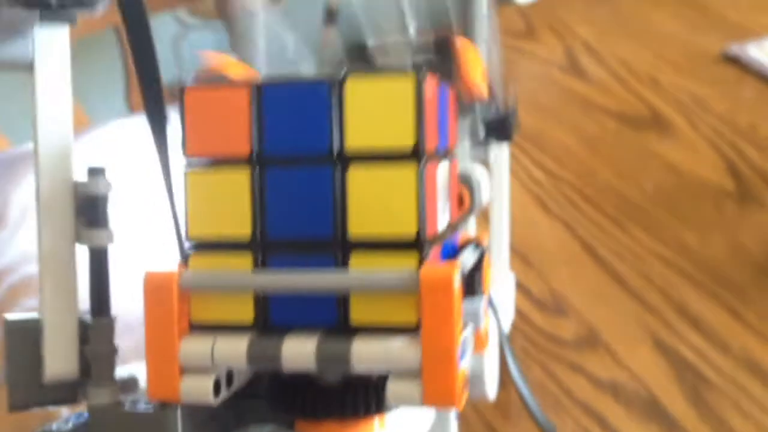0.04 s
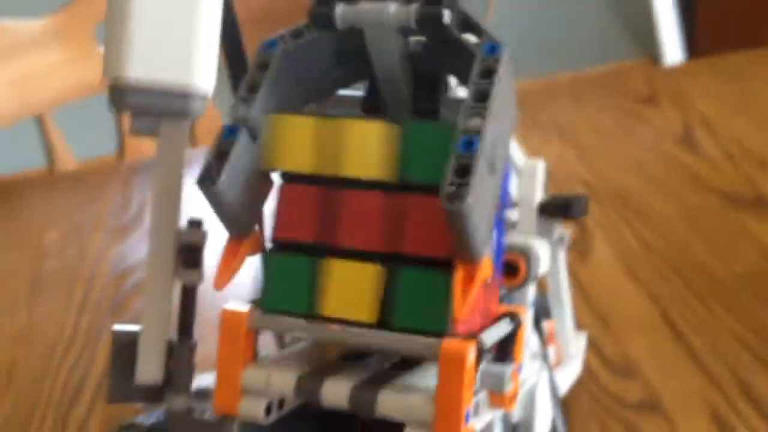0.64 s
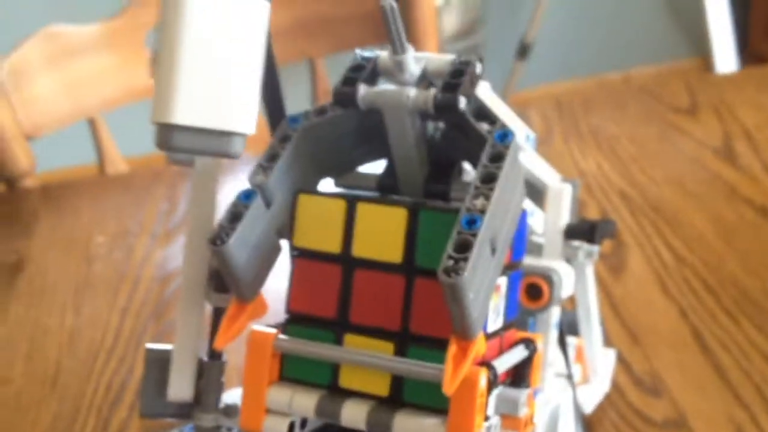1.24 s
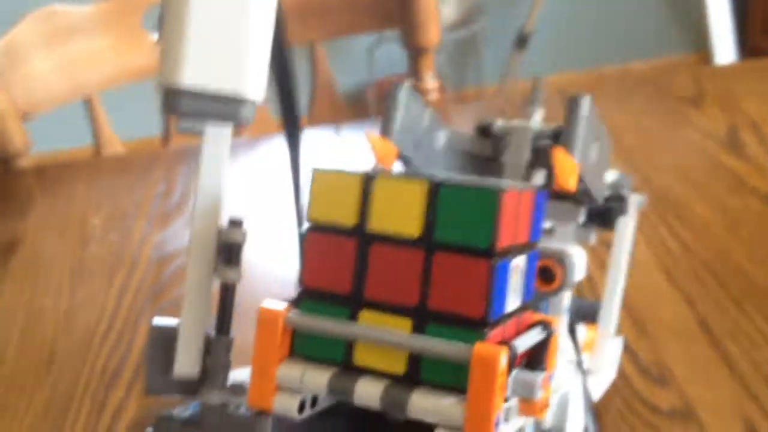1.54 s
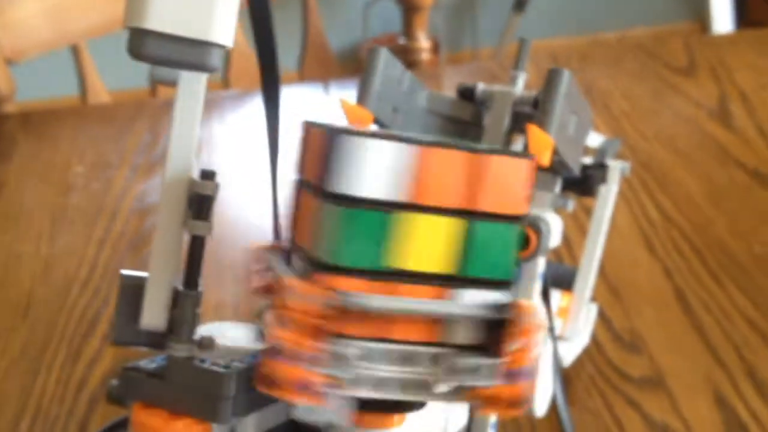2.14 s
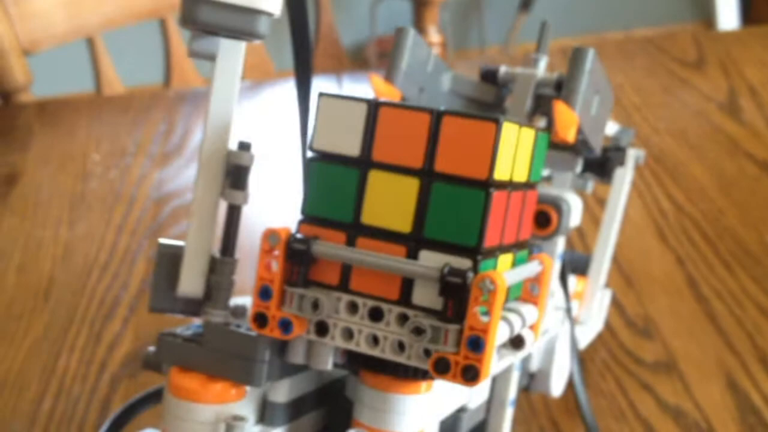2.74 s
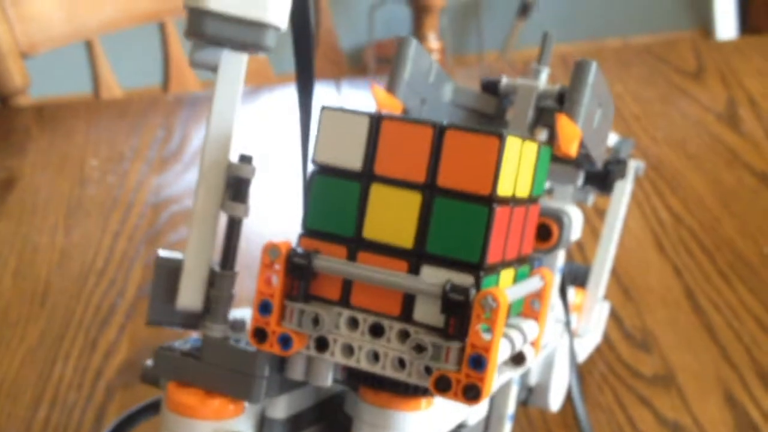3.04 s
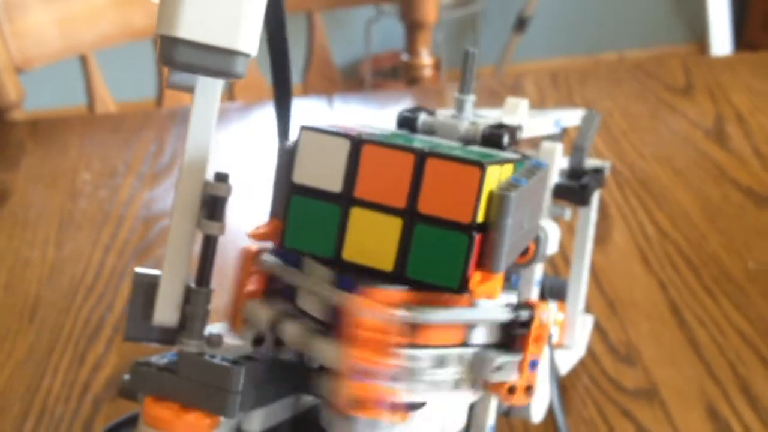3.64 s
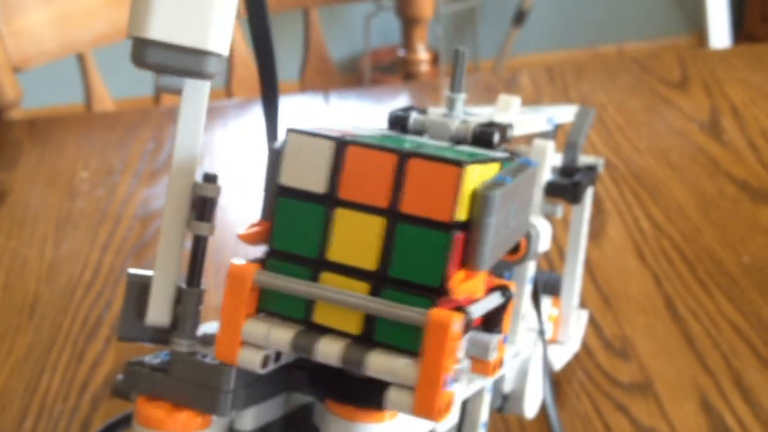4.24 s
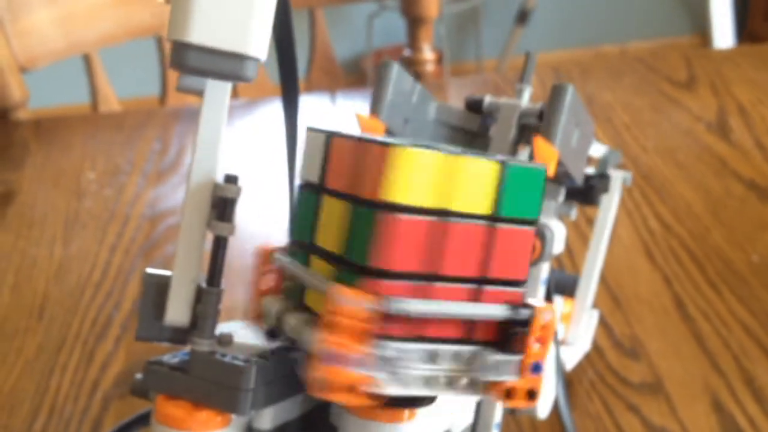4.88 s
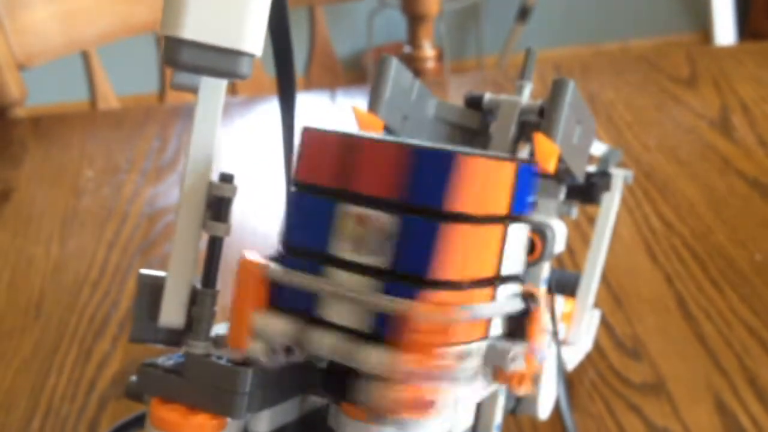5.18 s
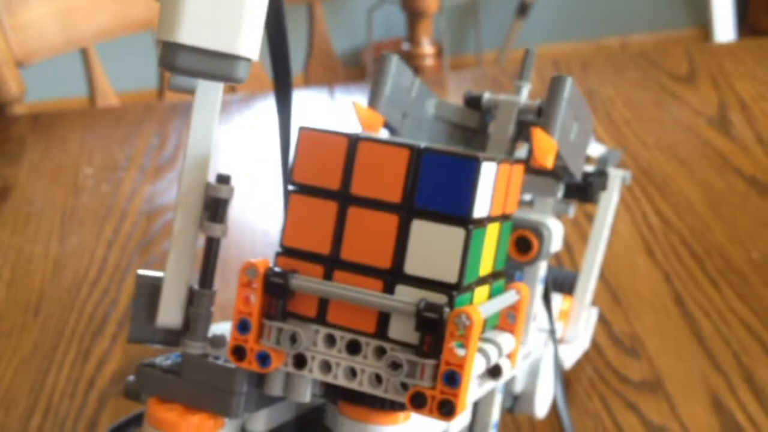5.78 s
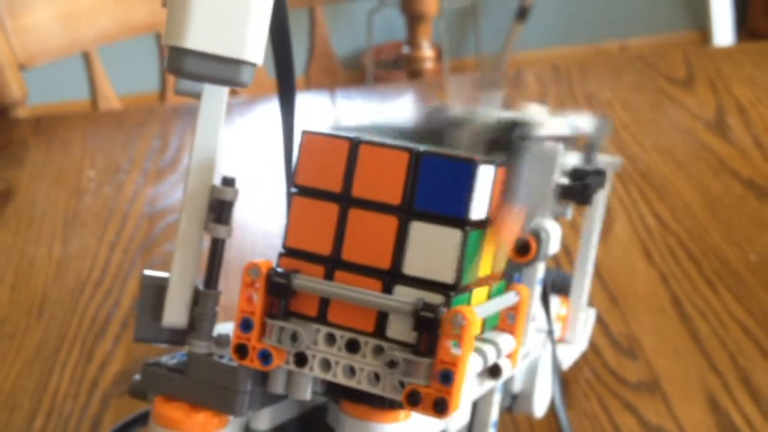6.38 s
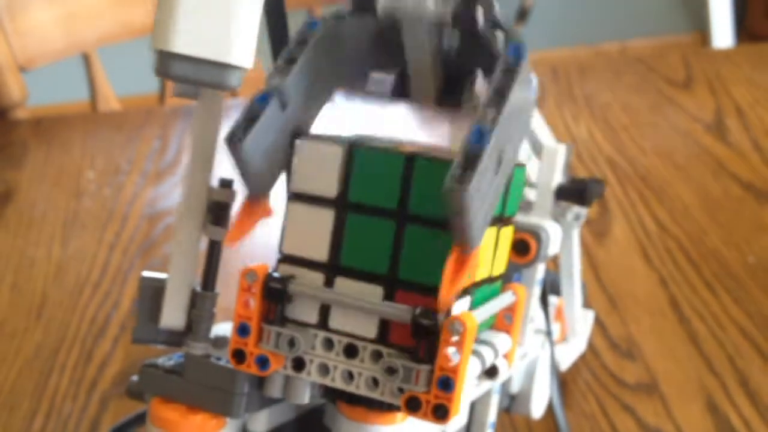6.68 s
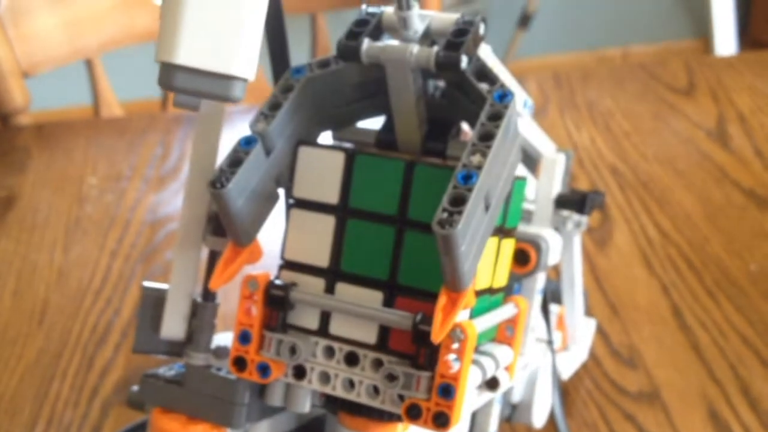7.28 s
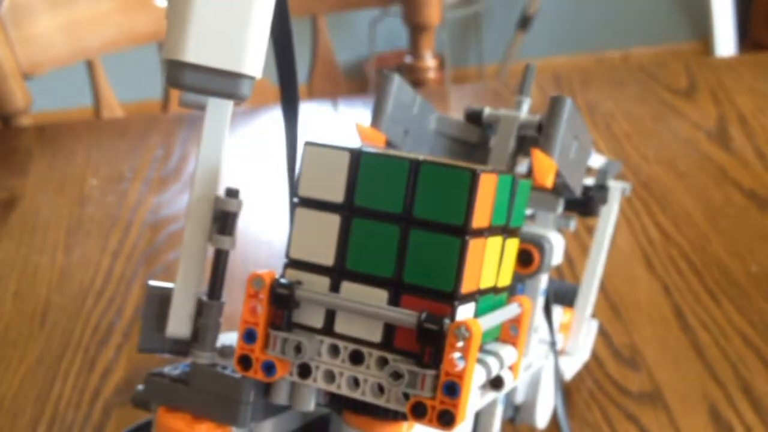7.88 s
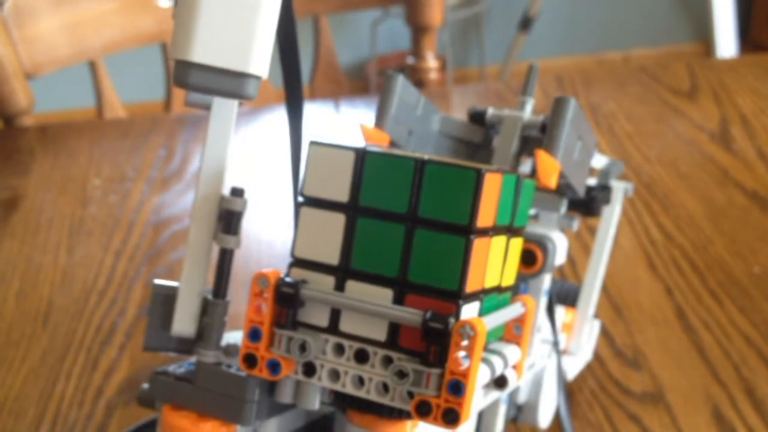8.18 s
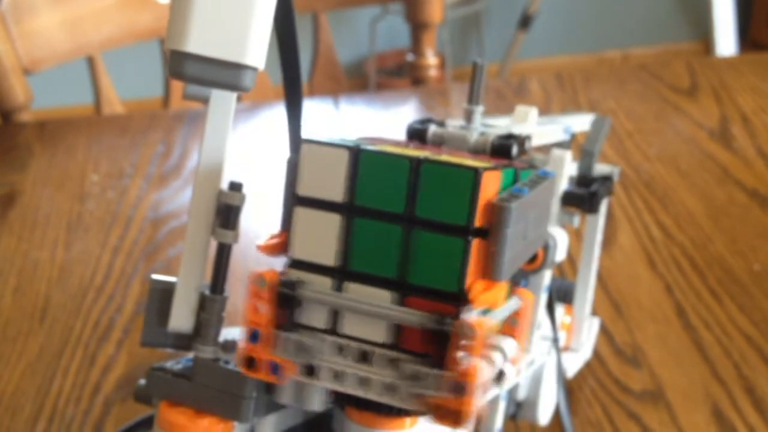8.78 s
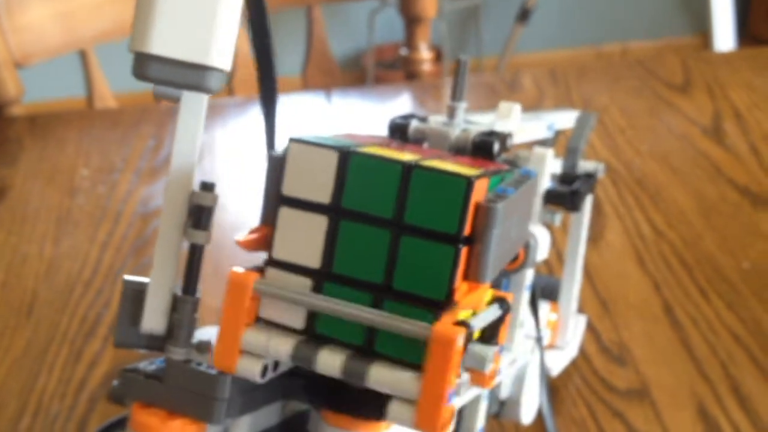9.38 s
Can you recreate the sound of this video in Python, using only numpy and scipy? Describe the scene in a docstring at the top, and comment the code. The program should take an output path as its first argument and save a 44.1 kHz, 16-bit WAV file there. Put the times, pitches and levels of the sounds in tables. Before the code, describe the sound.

Sharp plastic clacks alternate with short raspy whirs and rising whines as a small robot's geared motors flip and twist a puzzle cube.

```python
"""A small plastic robot solves a puzzle cube on a wooden table, over the hum of a quiet room.
First a geared motor swings the squeaky arm, which clacks onto the cube and tips it over. Near 2 s
a second motor spins the cube in its cradle with a pulsing rasp, then sings faintly as it holds still.
The arm clacks again, and near 4 s the cradle twists one layer with a rising whine. More clacks,
a second spin near 5 s and three more arm strokes lead to a last twist at 9 s."""
import sys
import numpy as np
from scipy import signal
from scipy.fft import rfft, irfft
from scipy.io import wavfile
from scipy.ndimage import uniform_filter1d

SR = 44100
rng = np.random.default_rng(int(sys.argv[2]) if len(sys.argv) > 2 else 0)


def wav_record(signal):
    """Record a signal, one row per channel, as 16-bit PCM in the file named by sys.argv[1]."""
    frames = np.transpose(np.atleast_2d(signal))
    bounded = np.clip(frames, -1, 1)
    # unit amplitude maps onto the largest positive 16-bit level
    quanta = np.round(bounded * 32767).astype(np.int16)
    wavfile.write(sys.argv[1], SR, quanta)


N = 419832
T = np.arange(N) / SR

# strokes of the arm: (start [s], stop [s], gear level [dB])
ARM_STROKES = [(0.036, 0.183, -45), (0.214, 0.39, -53.5), (0.494, 0.748, -42.5), (1.303, 1.308, -55.5),
               (1.503, 1.65, -43), (3.229, 3.332, -46.5), (4.653, 4.78, -45.5), (6.452, 6.775, -44),
               (7.468, 7.59, -42.5), (8.516, 8.567, -43.5)]
# whine of free-running gears: (multiple of the tooth rate, level [dB])
FREE_HARMONICS = [(1, -16), (2, -3), (3, -1), (4, -1), (5, -2), (6, 2), (7, -7.5), (8, -5.5)]
# plastic clacks of arm, cube and cradle:
# (time [s], level [dB], bright edge against that level [dB], attack [s], rattle decay [s])
CLACK_HITS = [(0.059, -17.5, -5, .001, .005), (0.0704, -17.5, 4.5, .0005, 0.0087),
              (0.1255, -12.5, 3.5, .002, 0.0066), (0.158, -10.5, 4, .003, 0.0054),
              (0.5568, -10, 0, .0001, 0.0024), (0.562, -8.5, 4.5, .0002, 0.004),
              (0.576, -17, -2.5, .002, .004), (0.662, -12, -9, .005, 0.0097),
              (0.7747, -12, -8.5, .0001, 0.0058), (0.930, -26, -16, .001, 0.0082),
              (1.288, -40, -22, .0005, 0.013), (1.533, -18, 0, .002, 0.01), (1.595, -19, 6.5, .001, 0.0071),
              (1.624, -14.5, 0, .001, 0.0065), (2.610, -35, -26, .0003, 0.0026),
              (3.243, -24.5, -6, .0005, 0.0056), (3.258, -21, 3, .002, .005),
              (3.308, -14, 1, .0001, 0.0056), (3.625, -24.5, -17, .0005, .004),
              (3.666, -15, -3.5, .0002, 0.0037), (4.397, -32, -21, .001, 0.0041),
              (4.694, -21.5, 9.5, .0005, 0.0036), (4.720, -22.5, 5, .002, 0.0066),
              (5.717, -40, -17, .0003, 0.0026), (5.762, -42.5, -14, .002, 0.0065),
              (6.417, -38, -20, .001, .01), (6.461, -19.5, -17, .0005, .003),
              (6.5208, -11, 2, .0001, 0.0039), (6.527, -10, 0.5, .0005, 0.0053),
              (6.637, -11.5, -5.5, .002, 0.0068), (6.7422, -15.5, 1, .001, .007),
              (6.8452, -18.5, 3, .0001, 0.0044), (7.495, -16.5, 4, .002, 0.005),
              (7.558, -14, 5, .004, 0.0083), (7.585, -12, 3, .002, 0.0072),
              (8.501, -28.5, -24, .0003, .004), (8.519, -21, -18, .001, .005),
              (8.553, -19, -15, .001, 0.0057), (8.590, -16, -7, .0003, 0.0053),
              (8.874, -41, -14, .0003, .005), (8.908, -24.5, -22, .0005, .004),
              (9.052, -21.5, -4, .0003, 0.0035)]
# tone colour of struck plastic: (frequency [Hz], level [dB])
PLASTIC_COLOUR = [(35, -50.5), (60, -28), (274, -15.5), (540, -16), (1250, -5.5), (1740, -10), (2140, -5.5),
                  (3940, -5), (4860, -5), (5330, -2.5), (6900, -2.5), (7750, -7.5), (13300, -13),
                  (14900, -13.5), (16000, -37.5)]
# resonances of the plastic frame: (frequency [Hz], width [Hz], lift [dB])
FRAME_RESONANCES = [(830, 240, 4), (1264, 120, 3.5), (2190, 115, 1.5), (3020, 220, 1), (4430, 250, 1.5),
                    (4860, 53, 3.5), (5890, 630, 1), (7000, 400, 0)]
# the cradle runs free to spin the cube or ease back into line: (start [s], stop [s], gear level [dB])
FREE_TURNS = [(1.78, 2.326, -41), (2.41, 2.467, -48), (4.331, 4.37, -47), (4.911, 5.43, -39),
              (5.54, 5.58, -46.5)]

START_HZ, TOP_HZ = 493.7, 728.6   # tooth rates of the cradle: setting off, and flat out running free
CRADLE_RISE_DB_PER_S, CRADLE_FALL_DB_PER_S = 454.5, 276


def from_db(db):
    """Decibels to gain."""
    return np.exp(np.asarray(db) * (np.log(10) / 20))


def rms_one(x):
    """Scale to unit rms."""
    return x / np.sqrt(np.mean(x ** 2) + 1e-20)


def at_hz(points, hz):
    """Read a table on a log-frequency axis."""
    f, value = np.transpose(points)
    return np.interp(np.log(np.maximum(hz, 1)), np.log(f), value)


def butter(x, hz, kind, order=2):
    """Butterworth filter."""
    sos = signal.butter(order, np.clip(hz, 10, .45 * SR), kind, fs=SR, output="sos")
    return signal.sosfilt(sos, x + 1e-18)


def drift(rate):
    """Smooth random wander of spread 1, with `rate` new values a second."""
    knots = rng.standard_normal(int(N / SR * rate) + 4)
    smooth = rms_one(signal.resample_poly(knots, 4, 1))
    return np.interp(T * rate * 4, np.arange(len(knots) * 4), smooth)


def add(track, s, sound):
    """Mix a short sound in at time s."""
    start = max(int(s * SR), 0)
    track[start:start + len(sound)] += sound[:N - start]


def coloured(x, spectrum, resonances=(), size=4096):
    """Minimum-phase EQ of unit power gain: a smooth curve with resonant humps."""
    hz = np.arange(size // 2 + 1) * SR / size
    humps_db = sum(lift / (1 + (2 * (hz - f) / width) ** 2) for f, width, lift in resonances)
    cepstrum = irfft(np.log(from_db(at_hz(spectrum, hz) + humps_db)))
    cepstrum[1:size // 2] *= 2
    cepstrum[size // 2 + 1:] = 0
    response = irfft(np.exp(rfft(cepstrum)))
    return signal.oaconvolve(x, response / np.linalg.norm(response))[:N]


def swell(t, peak_s):
    """Envelope that rises to 1 at peak_s and dies away."""
    return t / peak_s * np.exp(1 - t / peak_s)


def stroke(start, stop, rise_db_per_s, fall_db_per_s):
    """Envelope of one motor move: it swells up to its start, holds, and fades after its stop."""
    down_db = rise_db_per_s * np.maximum(start - T, 0) + fall_db_per_s * np.maximum(T - stop, 0)
    return from_db(-np.minimum(down_db, 200))


def speed_gain(tooth_hz, db_per_octave):
    """Faster gears are louder; the gain is 1 at TOP_HZ."""
    return from_db(db_per_octave * np.log2(tooth_hz / TOP_HZ))


def grit(per_s, spread_db):
    """Tiny random contacts of uneven size."""
    sizes = from_db(spread_db * np.minimum(rng.exponential(1, N), 4)) * rng.choice([-1, 1], N)
    return rms_one(sizes * (rng.random(N) < per_s / SR))


def gear_train(tooth_hz, harmonics, jitter, flutter_db, wobble):
    """Meshing teeth: a whine of uneven harmonics, and friction that peaks once per tooth."""
    phase = 2 * np.pi * np.cumsum(tooth_hz * (1 + jitter * drift(150))) / SR
    shaft = phase / 12   # twelve teeth a turn
    phase = phase + wobble * np.sin(shaft)   # an off-centre pinion gives sidebands
    whine = sum(from_db(db + flutter_db * drift(60)) * np.sin(round(k) * phase + rng.uniform(0, 2*np.pi))
                for k, db in harmonics)
    friction = grit(per_s=9000, spread_db=3) * (1 + .5 * np.cos(phase)) * (1 + .24 * np.sin(shaft))
    return rms_one(whine), rms_one(friction)


def room_tone():
    """A bed of low rushing air and mains hum."""
    # tone colour of the air: (frequency [Hz], level [dB])
    air_colour = [(18, -79.5), (30, -59), (90, -16.5), (103, -20.5), (157, -5), (364, -7.5), (437, -14.5),
                  (486, -11.5), (554, -15.5), (702, -14.5), (1430, -23.5), (3200, -30), (7870, -32.5),
                  (9220, -40), (14800, -35.5), (16000, -51.5)]
    air = butter(coloured(rng.standard_normal(N), air_colour), 95, "high")
    hum = np.sin(2 * np.pi * 120 * T)
    return from_db(-58) * air + from_db(-69.5) * hum


def arm_chirps(tooth_hz=562, sag_octaves_per_s=1.5, peak_s=.012):
    """The arm's gears sing briefly as each stroke sets off, sagging as they take the weight."""
    out, t = np.zeros(N), T[:SR // 10]
    phase = 2 * np.pi * np.cumsum(tooth_hz * 2 ** (-sag_octaves_per_s * t)) / SR
    for start, _, db in ARM_STROKES:
        scatter = rng.standard_normal(len(FREE_HARMONICS))
        pace = 1 + .03 * scatter[0]
        tone = sum(from_db(level + 3 * c) * np.sin(round(k) * pace * phase + np.pi * c)
                   for (k, level), c in zip(FREE_HARMONICS, scatter))
        add(out, start - peak_s / 2, from_db(db + 1) * swell(t, peak_s) * rms_one(tone))
    return out


def pivot_squeaks(hz=4900, peak_s=.007):
    """A dry pivot of the arm squeaks as it starts to move."""
    # squeaks of the pivot: (time [s], level [dB])
    squeaks = [(0.031, -38), (0.125, -23.5), (6.461, -35.5), (7.463, -35)]
    gain, t = np.zeros(N), T[:SR // 10]
    for s, db in squeaks:
        add(gain, s, from_db(db) * swell(t, peak_s))
    wavering_hz = hz * (1 + .012 * drift(400))
    return gain * np.sin(2 * np.pi * np.cumsum(wavering_hz) / SR)


def arm_gears():
    """Short strokes: the motor never settles, so its whine is smeared under gear chatter."""
    # tone colour of the chatter: (frequency [Hz], level [dB])
    chatter_colour = [(240, -49.5), (400, -14), (520, -24), (1580, 0), (3020, -3.5), (3580, -6),
                      (4880, -0.5), (5270, -3.5), (7060, -2.5), (9760, -11.5), (13300, -18), (15300, -26.5),
                      (16000, -40)]
    tooth_hz = 720 * (1 + .04 * drift(25))
    whine, friction = gear_train(tooth_hz, FREE_HARMONICS, jitter=.03, flutter_db=6, wobble=.18)
    chatter = coloured(friction, chatter_colour, FRAME_RESONANCES)
    moving = sum(from_db(db) * stroke(start, stop, rise_db_per_s=650, fall_db_per_s=450)
                 for start, stop, db in ARM_STROKES)
    return moving * (from_db(-4) * whine + from_db(3) * chatter + from_db(-4.5) * beam_ticks())


def beam_ticks(per_s=33, decay_s=.003):
    """Small random knocks of the arm's loose beams, each a brief rattle."""
    knocks = (rng.random(N) < per_s / SR) * rng.uniform(.54, 1, N)
    envelope = signal.lfilter([1], [1, -np.exp(-1 / (decay_s * SR))], knocks + 1e-18)
    rattle = rms_one(envelope * rng.standard_normal(N))
    return coloured(rattle, PLASTIC_COLOUR, FRAME_RESONANCES)


def clacks(rebound_db=-20, rebound_s=.022, crack=1.1):
    """Each blow cracks, rattles loose plastic for a few milliseconds and rebounds sparsely."""
    out, t = np.zeros(N), T[:SR // 12]
    s, db, edge_db, attack, decay = np.transpose(CLACK_HITS)[:, :, None]
    chatter, loose = rng.standard_normal((2, len(CLACK_HITS), len(t)))
    rattle = np.tanh(2 * chatter) * np.exp(-t / decay)
    rebounds = rms_one(np.sign(loose) * (abs(loose) > 2)) * np.exp(-t / rebound_s)
    bursts = rattle + from_db(rebound_db) * rebounds + crack * np.exp(-t * SR / 2)
    bursts *= 1 - np.exp(-(t + .0002) / attack)   # glancing blows build up
    body = from_db(-3) * butter(bursts, 2200, "low")
    middle = butter(bursts, [1500, 8500], "band")
    edge = from_db(edge_db) * butter(bursts, 8500, "high")
    for start, sound in zip(s[:, 0], from_db(db) * (middle - body - edge)):
        add(out, start, sound)
    return from_db(-6) * coloured(out, PLASTIC_COLOUR, FRAME_RESONANCES)


def table_thuds(attack_s=.0028, decay_s=.053, lag_s=.006):
    """Soft low thuds carried by the table top, alone or just after each clack."""
    # lone bumps on the table: (time [s], level [dB])
    bumps = [(0.16, -37), (3.514, -40.5), (9.179, -35)]
    under_clacks = [(s + lag_s, db - 32.5) for s, db, *_ in CLACK_HITS]
    out, t = np.zeros(N), T[:SR // 4]
    envelope = np.exp(-t / decay_s) * (1 - np.exp(-t / attack_s))
    for s, db in bumps + under_clacks:
        shake = rms_one(butter(rng.standard_normal(len(t)), [150, 400], "band"))
        add(out, s, from_db(db - 8) * shake * envelope)
    return butter(out, 91, "high")


def cube_knocks():
    """The cube lands or its layers snag, and its hollow body rings briefly."""
    # landings and snags: (time [s], level [dB])
    knocks = [(0.557, -22), (0.775, -27), (3.859, -40), (4.042, -38.5), (4.079, -38), (6.522, -26),
              (6.744, -35), (6.846, -43), (8.959, -27.5), (9.081, -33.5), (9.138, -40), (9.216, -42),
              (9.322, -32.5)]
    # modes of the hollow cube: (frequency [Hz], level [dB], t60 [s])
    modes = [(797, -23, 0.02), (808, 0, 0.068), (940, 4, 0.066), (1030, 4.5, 0.041), (1300, -22, .025)]
    out, t = np.zeros(N), T[:SR // 10]
    for s, db in knocks:
        scatter = rng.standard_normal(len(modes))
        ring = sum(from_db(level + 2 * c - 60 * t / t60) * np.sin(2 * np.pi * hz * (1 + .028 * c) * t)
                   for (hz, level, t60), c in zip(modes, scatter))
        add(out, s, from_db(db - 9.5) * ring)
    return butter(out, 640, "high")


def free_speed(run_up_s=.16):
    """Tooth rate of the free cradle, which runs up afresh at every move."""
    hz = np.full(N, START_HZ)
    for start, *_ in FREE_TURNS:
        after = T >= start
        hz[after] = TOP_HZ - (TOP_HZ - START_HZ) * np.exp((start - T[after]) / run_up_s)
    return hz


def cradle_spin():
    """Running free, the gears surge each time a tooth of the big wheel catches up: (whine, rasp)."""
    # a tooth takes up the load: (time [s], level [dB])
    surges = [(1.7835, -41), (1.859, -29.5), (1.93, -23.5), (2.0075, -20.5), (2.078, -21), (2.134, -21.5),
              (2.187, -23), (2.2433, -19.5), (2.3014, -20.5), (2.345, -24), (4.9755, -28), (5.0518, -23.5),
              (5.1223, -23), (5.1857, -21.5), (5.2456, -24), (5.302, -22.5), (5.3579, -22.5), (5.4094, -26),
              (5.4563, -20.5)]
    # tone colour of the rasp: (frequency [Hz], level [dB])
    rasp_colour = [(240, -77), (400, -20.5), (562, -34), (730, -15.5), (1060, -19), (1400, -3), (1630, -9),
                   (2150, -4.5), (2290, -5), (2930, 0), (5190, -4), (5600, -1.5), (12900, -21),
                   (15000, -30), (16000, -39)]
    tooth_hz = free_speed()
    whine, friction = gear_train(tooth_hz, FREE_HARMONICS, jitter=.016, flutter_db=2, wobble=.15)
    moving = sum(from_db(db) * stroke(start, stop, CRADLE_RISE_DB_PER_S, CRADLE_FALL_DB_PER_S)
                 for start, stop, db in FREE_TURNS)
    idle = moving * speed_gain(tooth_hz, db_per_octave=6.5)
    surge, t = np.zeros(N), T[:SR // 12]
    for s, db in surges:
        add(surge, s, from_db(db) * swell(t, peak_s=.0085) ** 2)
    whine_gain = from_db(-12.5) * surge + from_db(-13) * idle
    rasp_gain = from_db(-12) * surge + from_db(-1) * idle
    return whine_gain * whine, rasp_gain * coloured(friction, rasp_colour)


def holding_tone(hz=7962):
    """Switched current makes the stalled motor sing faintly."""
    # the motor holds the cradle still: (start [s], stop [s], level [dB])
    holds = [(2.46, 2.695, -72), (4.382, 4.639, -78), (5.6, 5.752, -71)]
    gate = sum(from_db(db) * (T > start) * (T < stop) for start, stop, db in holds)
    return uniform_filter1d(gate, size=2000) * np.sin(2 * np.pi * hz * T)


def loaded_speed(run_up_hz_per_s=900):
    """Tooth rate in the twists: a steady run-up, then whatever pace the layer allows."""
    # one speed curve per twist, sagging where the layers snag: (time [s], tooth rate [Hz])
    speed_curves = [
        [(3.7, 552), (3.738, 598.5), (3.836, 635.4), (3.89, 601.4), (3.928, 664), (4.032, 707), (4.054, 674),
         (4.192, 750.6), (4.2, 730)],
        [(9.04, 612.4), (9.13, 658), (9.21, 630), (9.31, 714), (9.356, 701.6), (9.37, 659.1), (9.382, 706),
         (9.436, 753), (9.47, 749)],
    ]
    hz = np.zeros(N)
    for s, pace in map(np.transpose, speed_curves):
        after = T > s[0] - .5
        hz[after] = np.interp(T[after], s, pace) - run_up_hz_per_s * np.maximum(s[0] - T[after], 0)
    return np.maximum(hz, START_HZ)


def layer_twist():
    """Under load the teeth stay in contact and sing through the housing, while the cube's layers rub."""
    # twists, with levels at TOP_HZ: (start [s], layer bites [s], stop [s], whine [dB], friction [dB])
    twists = [(3.625, 3.738, 4.2, -35, -38.5), (8.907, 9.063, 9.47, -34.5, -36.5)]
    # whine of loaded gears: (multiple of the tooth rate, level [dB])
    loaded_harmonics = [(1, -24), (2, -5), (3, -6.5), (4, -2), (5, -7.5), (6, -1), (7, -3), (8, -2),
                        (9, -13), (10, -4.5), (11, -6.5)]
    # resonances of the gear housing: (frequency [Hz], width [Hz], lift [dB])
    housing = [(1312, 79, 11), (2736, 250, 4.5), (3720, 160, 8), (4570, 530, 4)]
    # tone colour of the rubbing: (frequency [Hz], level [dB])
    rub_colour = [(240, -38), (400, -19), (570, -21), (1110, -10.5), (1310, -4), (1730, -8), (2750, -2.5),
                  (3260, -6), (4380, 1), (6150, -7.5), (7400, -6.5), (14600, -28.5), (16000, -20)]
    tooth_hz = loaded_speed()
    wavering_hz = tooth_hz * (1 + .004 * drift(35))
    whine, friction = gear_train(wavering_hz, loaded_harmonics, jitter=.005, flutter_db=2.5, wobble=.09)
    grind = 1 + .22 * drift(320)   # no two teeth bear the same load
    whine = rms_one(coloured(whine * grind, [(5000, -1.8), (10000, -1.2)], housing))
    whine_gain = rub_gain = 0
    for start, bite, stop, whine_db, friction_db in twists:
        moving = stroke(start, stop, CRADLE_RISE_DB_PER_S, CRADLE_FALL_DB_PER_S)
        creep_in = stroke(bite, stop, rise_db_per_s=85, fall_db_per_s=600)
        whine_gain += from_db(whine_db) * moving * creep_in
        rub_gain += from_db(friction_db) * moving
    singing = whine_gain * speed_gain(tooth_hz, db_per_octave=23) * whine
    rubbing = rub_gain * speed_gain(tooth_hz, db_per_octave=11) * coloured(friction, rub_colour)
    return singing + rubbing


def reverb(x, wet_db, build_up_s=.00071):
    """The room's diffuse tail, which dies at its own pace in each octave."""
    # room decay: (frequency [Hz], t60 [s])
    decay_times = [(200, 0.82), (800, 0.47), (2000, 0.48), (6000, 0.46), (9000, 0.37), (15000, 0.4)]
    t, tail = T[:int(.7 * SR)], 0
    edges = np.geomspace(80, 19000, 9)
    for low, high in zip(edges, edges[1:]):
        band = butter(rng.standard_normal(len(t)), [low, high], "band")
        tail += band * from_db(-60 * t / at_hz(decay_times, np.sqrt(low * high)))
    tail *= 1 - np.exp(-(t / build_up_s) ** 2)
    return from_db(wet_db) * signal.oaconvolve(x, tail / np.linalg.norm(tail))[:N]


def scene():
    """Robot and room, heard from one close point."""
    # the rattle radiates differently towards each wall, so the tail has no fixed pitch
    clack_tail = sum(reverb(clacks(), wet_db=-10) for wall in range(3))
    spin_whine, spin_rasp = cradle_spin()
    rattling = arm_gears() + spin_rasp
    twisting = layer_twist() + cube_knocks()
    chirping = spin_whine + pivot_squeaks() + arm_chirps()
    motors = rattling + twisting + chirping
    motor_tail = reverb(rattling, wet_db=-4.5) + reverb(twisting, -8.5) + reverb(chirping, -14)
    mono = clacks() + clack_tail + motors + motor_tail + table_thuds() + holding_tone() + room_tone()
    return np.array([mono, mono])


def record(dry, cutoff_hz=15400):
    """A steep low-pass shaves off the very top."""
    return signal.sosfilt(signal.ellip(10, .2, 70, cutoff_hz, fs=SR, output="sos"), dry)


dry = scene()
out = record(dry)
wav_record(out)
```